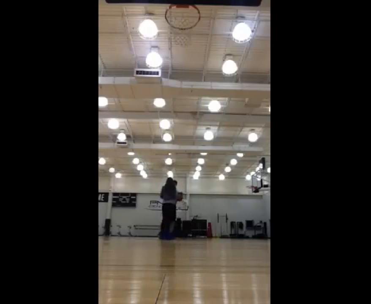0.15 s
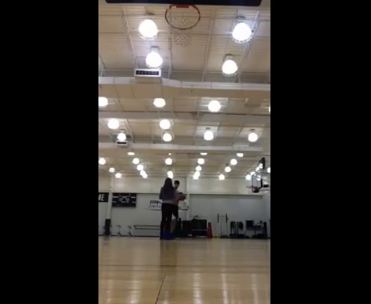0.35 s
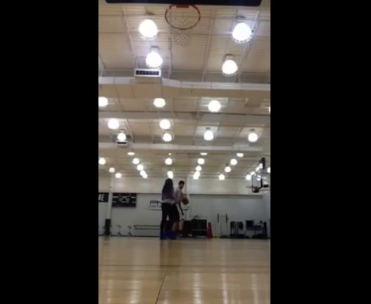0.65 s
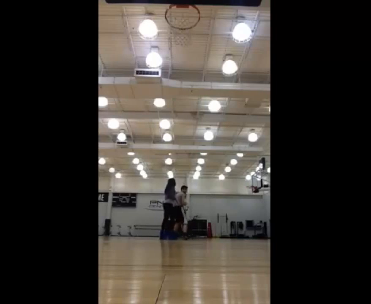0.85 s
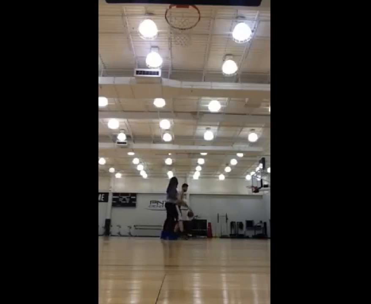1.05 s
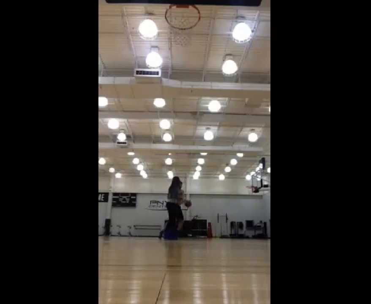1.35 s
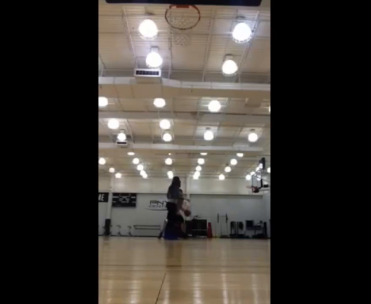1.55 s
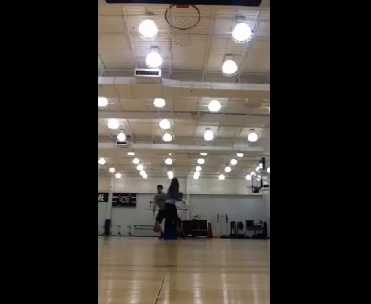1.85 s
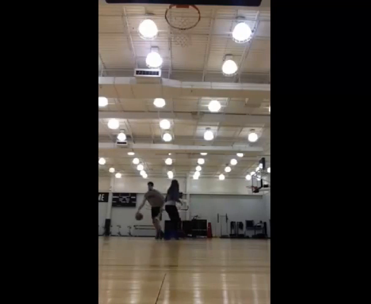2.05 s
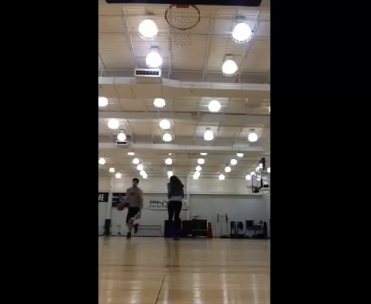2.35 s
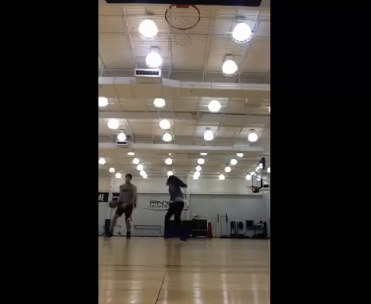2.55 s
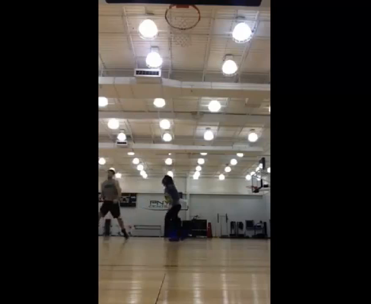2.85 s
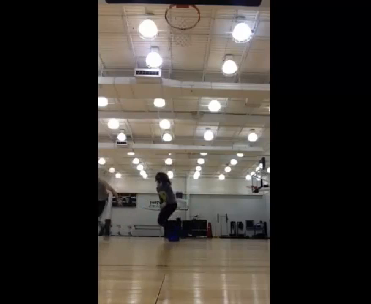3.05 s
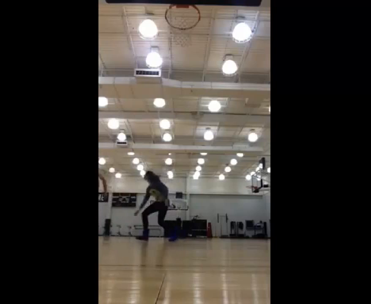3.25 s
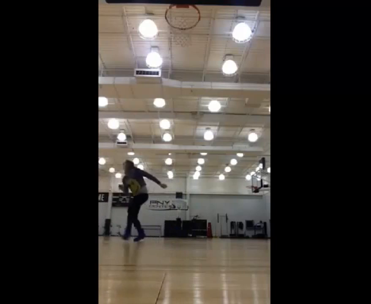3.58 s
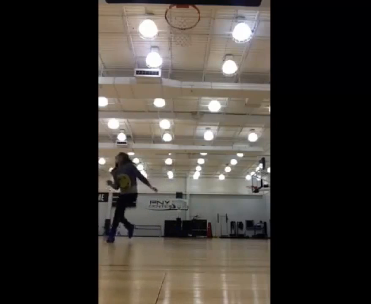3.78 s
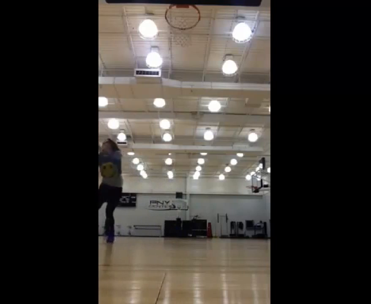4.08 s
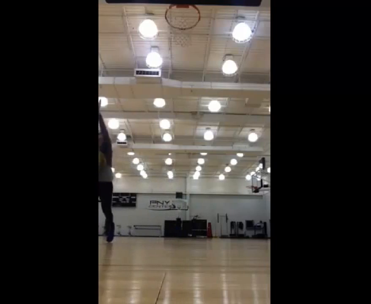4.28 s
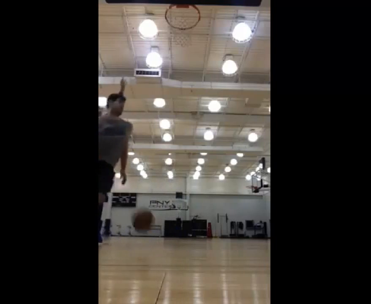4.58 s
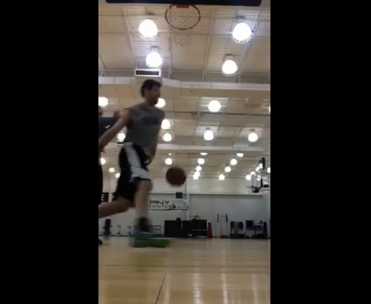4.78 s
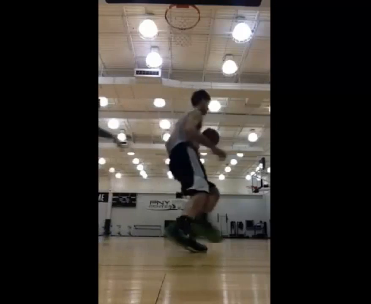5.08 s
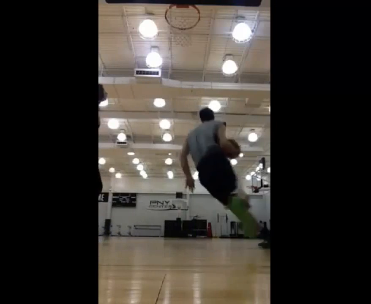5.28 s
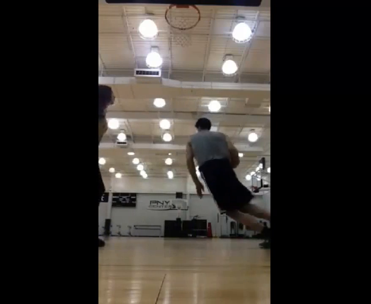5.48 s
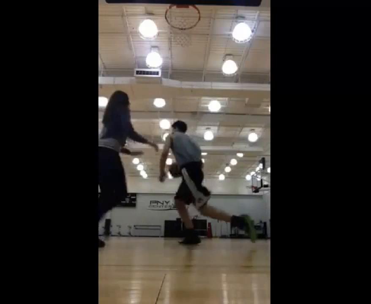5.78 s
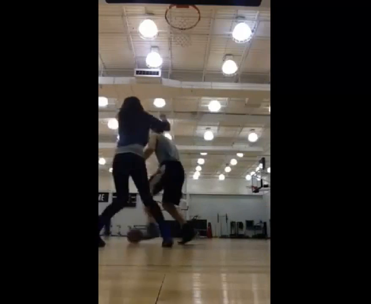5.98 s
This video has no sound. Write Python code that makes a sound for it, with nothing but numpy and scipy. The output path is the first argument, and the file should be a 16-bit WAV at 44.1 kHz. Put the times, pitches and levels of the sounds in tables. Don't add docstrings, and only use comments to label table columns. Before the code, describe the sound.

A large reverberant gym with soft, slightly fluttering ventilation rush and very faint steady hum. Light distant steps and a scuff come at 0.9 seconds, then at 1.0 a hard basketball bounce: deep wooden boom, sharp crack, hollow ping, tiny shoe chirps, clear slapback and long ringing tail. A second bounce lands at 2.0, slightly softer. At 2.3 to 2.4 two sharp steps bring a high, brief sneaker squeak that echoes. Soft steps patter around 2.9 to 3.3, then a closer bounce at 3.4 with a short lower squeak. From 4.0 footfalls approach, heaviest near 4.6, with board knocks and scuffs. Bounces at 4.8 and, softer, 5.0 mingle with stamping feet. Steps and sliding rubber thin out after 5.2; a dull, weak bounce with a wooden knock comes at 5.9, fading into hall ring. The small microphone flattens the loudest blows and sounds dull on top.

```python
import sys
import numpy as np
from scipy import signal
from scipy.fft import rfft, irfft
from scipy.io import wavfile
from scipy.ndimage import uniform_filter1d

SR = 44100
rng = np.random.default_rng(int(sys.argv[2]) if len(sys.argv) > 2 else 0)


def unload_audio(sound):
    columns = np.transpose(np.atleast_2d(sound))
    steps = np.round(np.clip(columns, -1, 1) * 32767)
    wavfile.write(sys.argv[1], SR, steps.astype(np.int16))


def natural_amplitude(level_db):
    exponent = np.asarray(level_db, float) / 20
    return 10 ** exponent


N = 270333
T = np.arange(SR // 3) / SR
SCATTER_DB = 2.5


def band(x, hz, width_hz):
    edges = [max(hz - width_hz / 2, hz / 4), min(hz + width_hz / 2, 0.45 * SR)]
    return signal.sosfilt(signal.butter(2, edges, "bandpass", fs=SR, output="sos"), x)


def fade(t60):
    return 10 ** (-3 * T / max(t60, 0.002))


def swell(n):
    return np.sin(np.pi * np.arange(n) / n)


def unit(x):
    return x / np.abs(x).max()


def add(track, start_s, x):
    i = int(start_s * SR)
    track[i:i + len(x)] += x[:len(track[i:])]


def alike(start_s, sound, hall_db):
    return start_s, sound, sound, hall_db


# start_s, crack_db, boom_db (peaks), distance_m, hall_db (share sent into the hall)
BOUNCES = [
    (1.0398, 1.5, 2, 10.4, -3.5),
    (1.9952, -2.5, -1.5, 7.9, -9.5),
    (3.3967, -1, 0.5, 3.4, -10),
    (4.7838, -3.5, -2.5, 1.1, -16.5),
    (5.013, -9.5, -6.5, 6.5, -16),
    (5.8614, -17.5, -6.5, 8.9, -18.5),
]


def dribble():
    sounds = []
    for start_s, crack_db, boom_db, distance_m, hall_db in BOUNCES:
        top_db = -4.5 - 0.4 * distance_m
        direct, spread = blow(crack_db, boom_db, top_db, crack_hz=1450, t60=0.082, ping_db=5.5, crack_t60=0.044)
        sounds.append((start_s, direct, spread, hall_db))
    return sounds


def blow(crack_db, boom_db, top_db, crack_hz, t60, ping_db, crack_t60):
    luck = rng.standard_normal((3, 9))
    crack_noise, top_noise, board_noise = rng.standard_normal((3, len(T)))
    boom = natural_amplitude(boom_db + 3.5) * floor_boom(t60, luck, board_noise)
    ping = ball_ping(luck)
    burst = (fade(crack_t60) + 1.9 * fade(0.0026)) * (1 - np.exp(-T / 0.00061))
    crack = band(crack_noise * burst, 1.35 * crack_hz, 1.48 * crack_hz)
    crack = unit(band(crack, 0.92 * crack_hz, 1.5 * crack_hz)) + natural_amplitude(ping_db) * ping
    top = unit(band(band(top_noise * burst, 4100, 5500), 7700, 7000))
    direct = boom + natural_amplitude(crack_db) * (unit(crack) + natural_amplitude(top_db) * top)

    click = (T == 0) * 1.0
    even = band(click, 2710, 3380) + natural_amplitude(top_db - 8.5) * band(click, 5130, 3500)
    spread = boom + natural_amplitude(crack_db) * (natural_amplitude(23.5) * even + natural_amplitude(ping_db - 5) * ping)
    return direct, spread


# pitch_hz, level_db
FLOOR_MODES = [(105, -10), (132, -1.5), (148, 0.5), (180, -1.5), (230, -3), (265, -8), (330, -5.5),
               (420, -11.5), (540, -19.5)]


def floor_boom(t60, luck, board_noise):
    boom = np.zeros(len(T))
    for (hz, db), strength, detune, phase in zip(FLOOR_MODES, *luck):
        tone = np.sin(2 * np.pi * hz * (1 + 0.04 * detune) * T + 1.48 * phase)
        boom += natural_amplitude(db + SCATTER_DB * strength) * tone * fade(t60 * (150 / hz) ** 0.5)
    push = 1 - np.exp(-(T / 0.0016) ** 2)
    boards = band(board_noise * fade(0.032), 666, 846)
    return unit(band(boom * push, 336, 520)) + natural_amplitude(-10) * unit(boards)


# pitch_hz, level_db, t60_s (time to fade by 60 dB)
BALL_MODES = [(1006, 1, 0.033), (1150, -12, 0.17), (1340, -2, 0.08), (1794, 14, 0.013), (2170, -17, 0.018),
              (2716, -0.5, 0.043), (3250, -1, 0.022), (3500, -16, 0.029), (4460, -28, .012)]


def ball_ping(luck):
    ping = np.zeros(len(T))
    for (hz, db, t60_s), strength, phase, _ in zip(BALL_MODES, *luck):
        ping += natural_amplitude(db + SCATTER_DB * strength) * np.sin(2 * np.pi * hz * T + 3 * phase) * fade(t60_s)
    return unit(ping) * (1 - np.exp(-(T / 0.0008) ** 2))


# start_s, pitch_hz, level_db (peak), hall_db
PINGS = [
    (1.149, 1200, -14.5, -9),
    (1.999, 1326, -19, -12.5),
    (2.041, 1260, -16, -18.5),
    (3.506, 1240, -28, -22),
    (4.784, 1086, -8, -14),
    (4.796, 1225, -13.5, -8),
    (5.014, 1628, -17.5, -17),
]


def pings():
    return [alike(start_s, knock(hz, db, t60=0.046), hall_db) for start_s, hz, db, hall_db in PINGS]


# delay_s, crack_db, boom_db, tick_db (relative to blow and hall share)
RETURNS = [(.012, -6, 2.5, -23), (.028, -12.5, 1.5, -32), (.053, 1, -3.5, -25), (.076, -11, -9, -23),
           (0.111, -17, -7, -14), (0.127, -23, -13.5, -35), (.150, -11, -10.5, -32),
           (.175, -19, -10.5, -31), (0.194, -11, -13, -28), (0.2098, -6.5, -3, -5), (.222, -21, -10.5, -28),
           (.255, -11, -8, -33), (.32, -22, -24, -29), (.365, -22, -14, -27), (.435, -21, -13, -21)]
# delay_s, crack_db, boom_db, tick_db
SIDE_WALL = (.138, -9, -12, -1)
# crack_db, boom_db, tick_db
CEILING_DB = (2, -16, 8)


def slaps_of_bounce(start_s, crack_db, boom_db, distance_m, hall_db):
    dull = dict(top_db=-23, crack_hz=1300, t60=0.056, ping_db=-1.5, crack_t60=0.031)
    crack, _ = blow(-0.5, -99, **dull)
    boom, _ = blow(-99, -1.5, **dull)
    tick = knock(3770, 0, 0.0016) + knock(1950, -2.5, 0.0023) + knock(5800, -13.5, 0.0032)

    ceiling_m, sound_m_s = 10.7, 343
    ceiling_s = (np.hypot(distance_m, 2 * ceiling_m) - distance_m) / sound_m_s
    far_slip_s = 0.001 * (8.6 - distance_m)
    sounds = []
    for delay_s, slap_crack_db, slap_boom_db, tick_db in [(ceiling_s, *CEILING_DB), SIDE_WALL] + RETURNS:
        sharp = natural_amplitude(crack_db) * (natural_amplitude(slap_crack_db) * crack + natural_amplitude(tick_db) * tick)
        slap = natural_amplitude(hall_db) * (sharp + natural_amplitude(boom_db + slap_boom_db) * boom)
        if delay_s > 0.2:
            delay_s = delay_s + far_slip_s
        sounds.append((start_s + delay_s, slap, 0 * T, 0))
    return sounds


# start_s, crack_db, boom_db (peaks), top_db (treble relative to crack), crack_hz
FAR_STEPS = [(0.879, -39, -27.5, -15, 1340), (0.914, -26.5, -38, -16.5, 1150),
             (0.9552, -32, -25.5, -8, 1040), (2.3284, -13.5, -34, -12, 2580), (2.394, -9, -14, -16, 3200),
             (2.9173, -33.5, -23, -1.5, 1150), (2.939, -24.5, -19, -14, 956),
             (2.9574, -18.5, -13, -24, 1360), (3.051, -30, -18, -6, 1470), (3.1069, -26, -26, -11, 1500),
             (3.3205, -25.5, -20, -36, 1300), (3.3424, -28, -19, -30, 1450)]
NEAR_STEPS = [(4.0317, -18, -15, -39, 1963), (4.0949, -19.5, -36.5, -8.5, 2120),
              (4.205, -11, -45, 11.5, 2530), (4.3579, -15, -15.5, -11, 1150), (4.4183, -19, -16, -9, 1720),
              (4.5097, -22, -48, -15.5, 2700), (4.562, -7, -5.5, -17, 2880), (4.5846, -5, -4.5, -4, 1080),
              (4.6017, -4.5, -4.5, -32, 2150), (4.7946, -9, -6, 2, 1120), (4.9922, -8.5, -11.5, -12, 1610),
              (5.0293, -12.5, -8.5, -7.5, 1380), (5.1836, -22, -33, -12, 960),
              (5.217, -25, -22.5, -24, 1070), (5.36, -17.5, -20.5, -5.5, 1090),
              (5.4116, -18, -18.5, -13, 1030), (5.5263, -30.5, -36, -25, 3730),
              (5.5628, -27.5, -29, -23, 1860), (5.6219, -31, -24, -2, 1290), (5.717, -34.5, -55, 1.5, 1350),
              (5.9356, -22, -45, -5, 1580), (6.1244, -31, -40, 1, 910)]
# start_s, hall_db
FEET_SHARE = [(.9, -9), (2.4, -9), (3.1, -9), (4.1, -9.5), (4.4, -10.5), (4.6, -16), (5.2, -12.5),
              (5.6, -22)]


def footsteps():
    share_s, share_db = np.transpose(FEET_SHARE)
    sounds = []
    for start_s, *hit in FAR_STEPS + NEAR_STEPS:
        direct, spread = blow(*hit, t60=0.069, ping_db=-2.5, crack_t60=0.02)
        sounds.append((start_s, direct, spread, np.interp(start_s, share_s, share_db)))
    return sounds


# start_s, length_s, pitch_hz, level_db, hall_db
SQUEAKS = [
    (1.019, 0.023, 2750, -27.5, -7),
    (1.03, .018, 2000, -20.5, -24),
    (2.394, 0.02, 3940, -18, -10.5),
    (2.396, 0.011, 3500, -18, -13),
    (3.386, 0.015, 2343, -13.5, -37),
]
# delay_s, length_s, level_db
SQUEAK_RETURNS = [
    (0.032, .02, -10),
    (0.047, 0.042, -9.5),
    (0.133, 0.037, -11.5),
    (.197, .025, -11.5),
    (0.295, 0.031, -20.5),
]


def squeaks():
    sounds = [alike(start_s, squeak(length_s, hz, db), hall_db) for start_s, length_s, hz, db, hall_db in SQUEAKS]
    start_s, _, hz, db, _ = SQUEAKS[2]
    for delay_s, length_s, loss_db in SQUEAK_RETURNS:
        sounds.append(alike(start_s + delay_s, squeak(length_s, hz, db + loss_db), -12))
    return sounds


def squeak(length_s, hz, db):
    n = int(length_s * SR)
    waver, rough = uniform_filter1d(rng.standard_normal((2, len(T))), size=60)[:, :n]
    phase = 2 * np.pi * np.cumsum(hz * (1 + 0.14 * waver)) / SR
    tone = np.sin(phase) + natural_amplitude(-12) * np.sin(2 * phase)
    return natural_amplitude(db + 28 * rough) * tone * swell(n)


# start_s, length_s, centre_hz, level_db
SCUFFS = [(0.868, 0.054, 546, -36.5), (0.997, 0.21, 2860, -28.5), (1.231, 0.031, 2320, -22.5),
          (1.46, 0.11, 6400, -48.5), (1.899, 0.099, 2540, -43), (2.098, 0.16, 3400, -39.5),
          (2.377, 0.036, 3730, -26), (2.42, 0.064, 3000, -44), (2.922, 0.064, 3270, -34.5),
          (2.927, 0.037, 695, -28), (3.038, 0.18, 1300, -41), (3.167, 0.24, 5560, -48),
          (3.274, 0.019, 523, -33), (3.31, .068, 1960, -34), (3.384, 0.029, 4180, -14),
          (4.2, 0.02, 5860, -22.5), (4.388, 0.057, 2630, -32), (4.572, 0.04, 3520, -22.5),
          (4.654, 0.035, 4570, -36), (4.752, 0.076, 3650, -26), (4.96, 0.063, 1905, -31),
          (5.061, 0.04, 5430, -35.5), (5.107, 0.27, 2700, -42), (5.186, .072, 486, -35),
          (5.202, 0.2, 6600, -43.5), (5.375, 0.058, 6930, -37), (5.893, 0.047, 3340, -39)]


def scuffs():
    return [alike(start_s, scuff(length_s, hz, 1.52 * hz, db), -8) for start_s, length_s, hz, db in SCUFFS]


# start_s, length_s, centre_hz, level_db
SLIDES = [(3.831, 0.065, 5220, -45), (4.208, .016, 2800, -23), (4.226, 0.065, 7300, -39.5),
          (4.233, 0.062, 3300, -41), (4.823, .06, 5530, -33), (4.847, 0.31, 1230, -41),
          (4.934, .03, 4540, -43), (5.19, 0.23, 2500, -41.5), (5.426, 0.016, 3200, -38),
          (5.563, 0.086, 4020, -47), (5.85, 0.026, 940, -29.5), (6.102, 0.06, 4000, -44)]


def slides():
    return [alike(start_s, scuff(length_s, hz, 0.63 * hz, db), -12) for start_s, length_s, hz, db in SLIDES]


def scuff(length_s, hz, width_hz, db):
    n = int(length_s * SR)
    noise, lumps = rng.standard_normal((2, len(T)))
    grain = natural_amplitude(22.62 * uniform_filter1d(lumps, size=64))
    x = band(band(noise * grain, hz, width_hz), hz, 0.89 * width_hz)[:n]
    return natural_amplitude(db) * x / x.std() * swell(n) ** 0.93


# start_s, pitch_hz, level_db (peak)
KNOCKS = [(.879, 497, -23), (1.045, 189, 2), (1.245, 40, -18), (1.288, 2430, -7), (2.003, 139.3, -2),
          (2.329, 4400, -10.5), (2.956, 420, -20.5), (3.047, 578, -15), (3.5, 44.6, -24), (4.032, 282, -14),
          (4.032, 2000, -10.5), (4.206, 930, -14), (4.262, 4800, -7), (4.357, 326, -12), (4.562, 299, -7.5),
          (4.587, 3050, -2), (4.587, 243, -3.5), (4.59, 150, -20), (4.99, 45, -18), (5.0, 181, -7.5),
          (5.39, 45, -35), (5.5, 504, -29), (5.619, 305, -20), (5.855, 406, -4.5), (5.861, 343, -12),
          (5.862, 1600, -12), (5.8948, 139, -15)]


def knocks():
    return [alike(start_s, knock(hz, db, t60=0.034 * 400 / hz), -20) for start_s, hz, db in KNOCKS]


def knock(hz, db, t60):
    ring = np.sin(2 * np.pi * hz * T) * fade(t60) * (1 + 0.13 * rng.standard_normal(len(T)))
    return natural_amplitude(db) * unit(band(ring, 1.074 * hz, 1.4 * hz))


# centre_hz, t60_s, level_db
HALL = [(58.7, 2.6, -8), (126, 2.1, -4.5), (235.6, 1.92, 0.5), (481, 2.09, 1), (880, 2.1, -4.5),
        (1790, 2.53, -5), (3670, 1.34, -5.5), (7100, 0.78, -4.5)]


def hall(send):
    t = np.arange(2 * SR) / SR
    lumps = natural_amplitude(25.48 * uniform_filter1d(rng.standard_normal(len(t)), size=220))
    lumps *= natural_amplitude(70 * uniform_filter1d(rng.standard_normal(len(t)), size=900))
    tail = np.zeros(len(t))
    for hz, t60_s, db in HALL:
        tail += natural_amplitude(db - 60 * t / t60_s) * band(rng.standard_normal(len(t)) * lumps, hz, 0.78 * hz)
    build_up = 1 - np.exp(-(t / 0.011) ** 2)
    early_boost = 1 + 3.1 * np.exp(-t / 0.022)
    return signal.fftconvolve(send, tail * build_up * early_boost * natural_amplitude(-32))[:N]


# pitch_hz, level_db (per Hz)
AIR = [(15, -70), (25, -24), (209, -3.5), (238, -2.5), (270, -6.5), (534, -15), (591, -17.5), (886, -24),
       (1060, -20), (1140, -27), (1990, -28.5), (2260, -29.5), (4700, -31), (10600, -42.5), (13700, -53),
       (22000, -120)]
# pitch_hz, level_db
HUMS = [(1443, -69), (2040, -65), (4802, -71)]


def ventilation():
    f = np.fft.rfftfreq(N, 1 / SR) + 1
    air_hz, air_db = np.transpose(AIR)
    shape = natural_amplitude(np.interp(np.log(f), np.log(air_hz), air_db))
    air = irfft(rfft(rng.standard_normal(N)) * shape, N)
    air *= natural_amplitude(40 * uniform_filter1d(rng.standard_normal(N), size=3600))
    t = np.arange(N) / SR
    hum = sum(natural_amplitude(db + 7.5) * np.sin(2 * np.pi * hz * t) for hz, db in HUMS)
    return natural_amplitude(-38) * air / air.std() + hum


def scene():
    near, send = np.zeros(N), np.zeros(N)
    sounds = dribble() + footsteps()
    for bounce in BOUNCES:
        sounds += slaps_of_bounce(*bounce)
    sounds += scuffs() + squeaks() + knocks() + pings() + slides()
    for start_s, direct, spread, hall_db in sounds:
        add(near, start_s, direct)
        add(send, start_s, natural_amplitude(hall_db) * spread)
    return (near + hall(send) + ventilation())[None]


def top_cut(x):
    return signal.sosfilt(signal.butter(12, 10720, fs=SR, output="sos"), x)


def record(dry):
    x = signal.sosfilt(signal.butter(1, 75, "highpass", fs=SR, output="sos"), dry)
    x = x / (1 + np.abs(x / 1.02) ** 8) ** (1 / 8)
    x = signal.sosfilt(signal.ellip(8, 0.3, 60, 10120, fs=SR, output="sos"), x)
    return top_cut(np.clip(x, -0.99, 0.99))


dry = scene()
out = record(dry)
unload_audio(out)
```